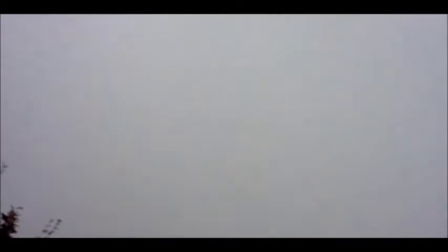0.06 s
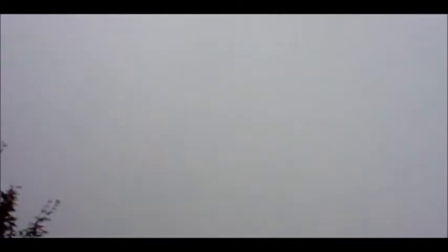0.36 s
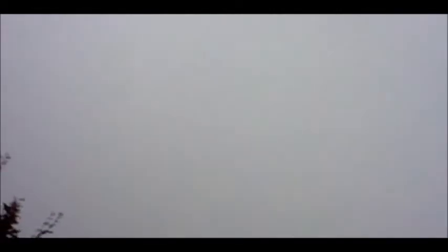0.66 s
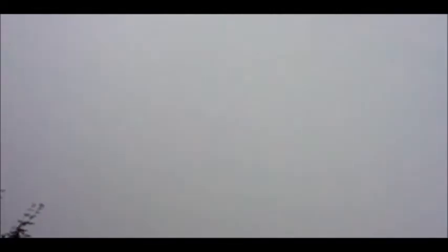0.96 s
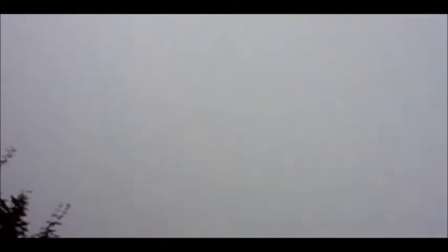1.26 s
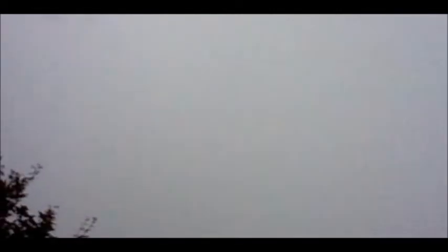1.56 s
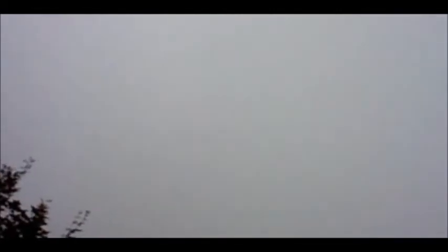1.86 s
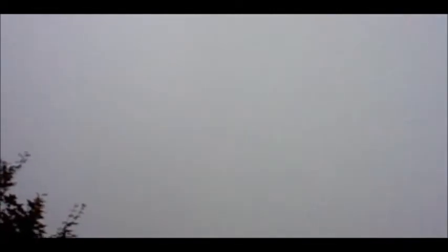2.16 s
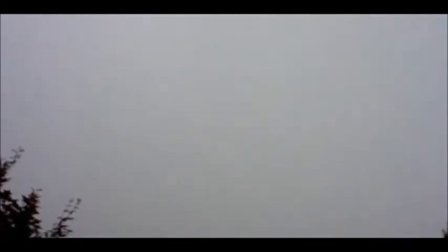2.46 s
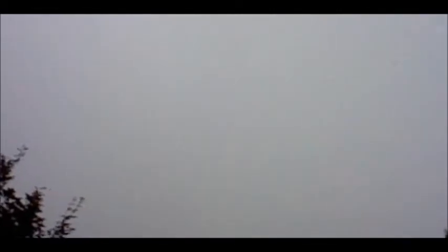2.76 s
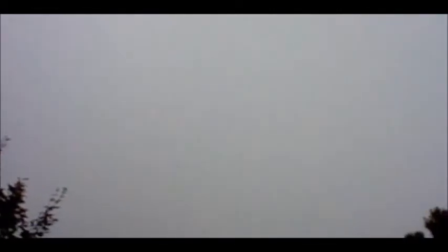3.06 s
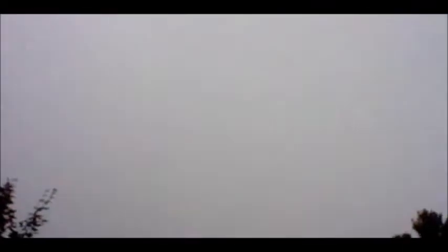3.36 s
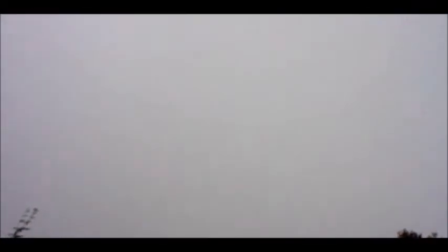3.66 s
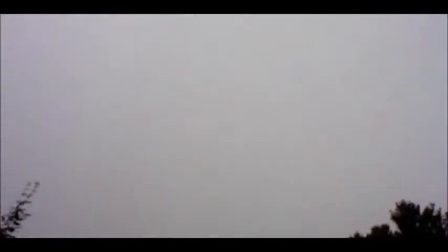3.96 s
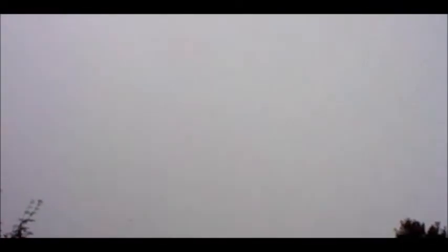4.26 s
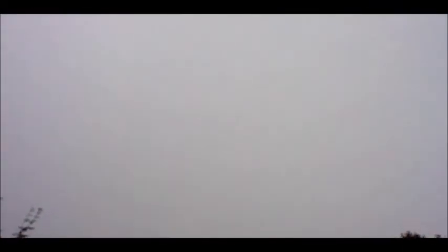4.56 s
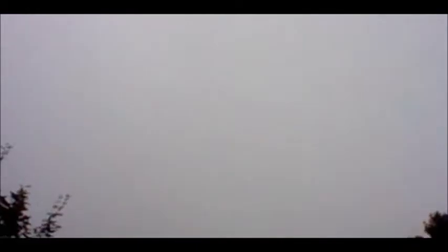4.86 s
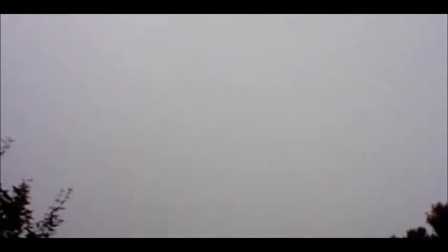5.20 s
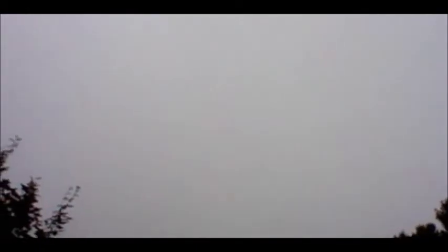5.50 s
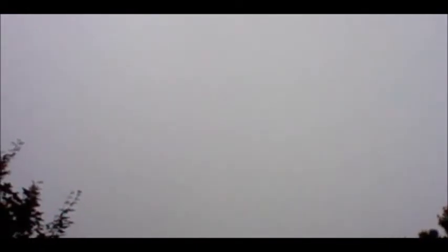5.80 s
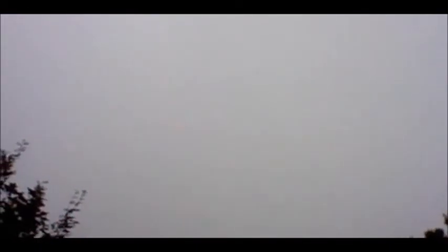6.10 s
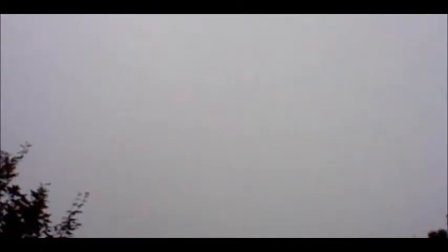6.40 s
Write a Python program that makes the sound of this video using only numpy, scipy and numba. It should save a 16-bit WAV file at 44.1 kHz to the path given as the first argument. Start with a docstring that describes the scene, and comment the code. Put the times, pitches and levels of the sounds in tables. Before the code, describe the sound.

A low mutter, then a sudden close thunderclap that overloads the microphone and rolls on in repeated peals over light wind.

```python
"""Thunder from a close lightning strike: a low mutter, a clap that overloads a small microphone, then
rolling peals. Each stretch of the lightning's path sends a cluster of shock waves that swells, holds
and dies; near ones are heavy, far ones lack bass. Land and houses scatter them into a fading rumble.
Behind it are light wind, a faint insect and a few ticking drops. The sound cuts out once, briefly."""
import sys
import numpy as np
from scipy import signal
from scipy.fft import rfft, irfft, next_fast_len
from scipy.io import wavfile
from scipy.ndimage import uniform_filter1d
from numba import njit

SR = 44100
rng = np.random.default_rng(int(sys.argv[2]) if len(sys.argv) > 2 else 0)


def master_out(mix):
    """Clip the mix to full scale and print it as 16-bit PCM to the path in sys.argv[1]."""
    frames = np.transpose(np.atleast_2d(mix))
    ceiling = np.clip(frames, -1, 1)
    pcm = np.round(ceiling * 32767).astype(np.int16)
    wavfile.write(sys.argv[1], SR, pcm)


N = 292824
TIME = np.arange(N) / SR

# Peals of thunder, one per stretch of the lightning's path. The body is a peal's middle range.
# (start [s], hold [s], body [dB], deep boom [dB], echoes [dB], pitch [Hz], pitched share of body [0-1])
PEALS = [(.872, 0.043, -45.5, -57, -61, 410, 0.05), (1.294, 0.065, -38, -40, -55, 340, 0.3),
         (1.392, 0.049, -35.5, -46, -59, 380, 0.13), (1.705, 0.018, -26.5, -10, -30.5, 226, 0),
         (1.737, 0.046, -10, -6, -29, 378, 0.07), (1.835, .04, -30.5, -15.5, -47, 297, 0),
         (1.908, 0.035, -23.5, -14.5, -38, 225, 0), (2.011, 0.046, -15.5, -20.5, -33, 401, 0.27),
         (2.21, 0.024, -13, -12.5, -33, 429, 0.3), (2.297, 0.092, -20, -22, -44.5, 340, 0.12),
         (2.538, 0.074, -13, -11.5, -39, 198, 0.23), (2.669, 0.053, -21, -32, -42, 288, 0.4),
         (2.778, 0.072, -13, -14.5, -32.5, 351, 0.42), (2.915, 0.056, -10.5, -13, -36, 210, 0.63),
         (3.075, 0.042, -13, -29.5, -43, 270, 0.97), (3.165, .035, -25, -25, -44, 241, 0.2),
         (3.243, 0.078, -20.5, -23.5, -39.5, 211, 0.76), (3.51, 0.071, -26, -35, -38.5, 273, 0.83),
         (3.748, 0.098, -16, -27, -43.5, 259, 0.75), (3.969, 0.027, -26.5, -43, -62, 226, .4),
         (4.067, 0.19, -22, -36, -41, 233, 0.48), (4.116, 0.048, -16.5, -17, -38.5, 227, 0.8),
         (4.26, 0.096, -29, -33.5, -65, 215, 0.4), (4.529, 0.013, -26, -46, -54, 246, 0.9),
         (4.783, 0.086, -18, -37, -45, 263, 0.63), (4.951, 0.037, -18, -32, -39, 221, 0.46),
         (5.018, 0.058, -20, -27, -54, 245, 0.1), (5.141, 0.049, -24, -45, -46, 220, 0.33),
         (5.273, 0.077, -16.5, -33, -43, 370, 0.34), (5.41, 0.065, -28.5, -39, -55, 294, 0),
         (5.858, 0.043, -18, -52, -44.5, 248, 0.98), (5.939, 0.05, -19, -47, -44, 231, 0.22),
         (6.231, 0.052, -24.5, -36, -47.5, 203, 0.5), (6.303, .05, -25, -49, -53, 196, 0.68),
         (6.546, 0.081, -20, -43, -48, 258, 0.31)]


def undb(db):
    """Turn decibels into a factor to multiply by."""
    return 10 ** (np.asarray(db) / 20)


def unit(x):
    """Scale a sound so that its average power is 1."""
    return x / np.sqrt(np.mean(x ** 2))


def colour(x, spectrum):
    """Shape a sound's tone with a curve of (frequency [Hz], level [dB]) points."""
    hz, db = np.transpose(spectrum)
    size = next_fast_len(N + SR // 4, True) // 2 * 2
    bin_hz = np.maximum(np.arange(size // 2 + 1) * SR / size, 1)
    gain = undb(np.interp(np.log(bin_hz), np.log(hz), db))
    # These steps make the filter ring only after each click, never before it.
    cepstrum = irfft(np.log(gain))
    cepstrum[1:size // 2] *= 2
    cepstrum[size // 2 + 1:] = 0
    return irfft(rfft(x, size) * np.exp(rfft(cepstrum)))[:N]


@njit
def resonate(x, hz, width_hz):
    """Let through the sound near a pitch that may move (a state-variable filter)."""
    out, band_state, low_state = np.empty(len(x)), 0., 0.
    for i in range(len(x)):
        step, damping = np.tan(np.pi * hz[i] / SR), width_hz / hz[i]
        ring = (band_state + step * (x[i] - low_state)) / (1 + step * (step + damping))
        band_state = 2 * ring - band_state
        low_state += 2 * step * ring
        out[i] = damping * ring
    return out


def band(x, hz, width_hz):
    """Resonate twice, so that little outside the band is left."""
    hz, width_hz = hz * np.ones(N), float(width_hz)
    return resonate(resonate(x, hz, width_hz), hz, width_hz)


def arrivals(per_s, spread_db):
    """Clicks of random time, sign and size."""
    hit = rng.random(N) < per_s / SR
    return hit * rng.choice([-1, 1], N) * undb(spread_db * rng.exponential(size=N))


def even(x, span_s):
    """Hold the power near 1 over every span, keeping the finer grain."""
    x, span = unit(x), max(int(span_s * SR), 2)
    power = uniform_filter1d(uniform_filter1d(x ** 2, span), span)
    return x / np.sqrt(np.abs(power) + 1e-6)


def swell(start, hold, release_s, attack_s=0.0091):
    """Loudness of one peal over time: it rises quickly, holds and dies away."""
    early, late = np.maximum(start - TIME, 0), np.maximum(TIME - start - hold, 0)
    return np.exp(-np.minimum(early / attack_s + late / release_s, 20))


def rumble(before_db, build_db_per_s, after_db, fade_db_per_s, clap_s=1.697):
    """Loudness of the rumble over time: it builds, jumps at the clap, then fades."""
    age = TIME - clap_s
    return undb(np.where(age < 0, before_db + build_db_per_s * age, after_db - fade_db_per_s * age))


def wind(level_db=-43):
    """Light steady wind and distant hiss."""
    # Tone of the moving air: (frequency [Hz], level [dB])
    wind_tone = [(20, -3), (60, 4.5), (100, -5), (150, -11.5), (400, -19.5), (700, -25.5), (1100, -23.5),
                 (1800, -34.5), (3000, -34.5), (6000, -37), (8000, -54)]
    return unit(colour(rng.standard_normal(N), wind_tone)) * undb(level_db)


def insect(level_db=-61.5, first_chirp_s=.15, chirp_every_s=.3236, floor=0.49):
    """A far insect rasps in one thin high band, swelling about three times a second."""
    rasp = unit(band(rng.standard_normal(N), hz=6626, width_hz=640))
    chirp = np.cos(np.pi * (TIME - first_chirp_s) / chirp_every_s) ** 2
    return rasp * (floor + (1 - floor) * chirp) * undb(level_db)


def drops(splash_db=-5, splash_s=0.0022, attack_s=0.0012):
    """Each drop splashes and rings briefly; it lands on its own spot, so no two sound alike."""
    # Drops near the microphone: (time [s], peak level [dB], brightness [dB per octave])
    landings = [(0.6584, -18.5, -4.5), (.869, -39, -3), (.874, -45, -2), (1.422, -35, -7.5),
                (2.014, -32, 11), (2.099, -35, -5), (2.169, -22.5, -8), (2.9171, -20, -4),
                (4.49, -23.5, -2), (4.504, -25.5, -2.5), (4.667, -33, 2), (4.673, -31.5, -9),
                (4.684, -33, 5), (6.433, -34.5, -8.5)]
    # Tones a drop rings with: (frequency [Hz], level [dB], time to fade by 60 dB [s])
    tones = [(730, -14.5, 0.006), (1270, -6, 0.0051), (2240, 0, 0.0044), (3090, -4.5, 0.0051),
             (4016, -14, 0.014), (5410, 3.5, 0.0048), (6550, -7, 0.0065)]
    out, t = np.zeros(N + SR), TIME[:SR // 20]
    hz, tone_db, fade_s = np.transpose(tones)[:, :, None]
    for time_s, peak_db, brightness in landings:
        tilt_db = brightness * np.log2(hz / hz.max())  # soft drops favour the low tones
        level_shift, pitch_shift = rng.standard_normal((2, len(hz), 1))
        loudness = undb(tone_db + tilt_db + 2 * level_shift - 60 * t / fade_s)
        ring = loudness * np.sin(2 * np.pi * hz * (1 + .015 * pitch_shift) * t)
        splash = undb(splash_db) * rng.standard_normal(len(t)) * np.exp(-t / splash_s)
        tick = (ring.sum(axis=0) + splash) * (1 - np.exp(-t / attack_s))
        start = int(time_s * SR)
        out[start:start + len(t)] += undb(peak_db) * tick / np.abs(tick).max()
    return out[:N]


def peals(rumble_hz=210, rumble_pitched=0.2):
    """Shock waves rounded by the air: long ones boom, short ones roll, alike ones give a pitch."""
    # Tone of the short, rolling waves: (frequency [Hz], level [dB])
    body_tone = [(70, -16), (120, -13.5), (160, 1.5), (205, 2.5), (250, -4), (330, -2.5), (420, -3.5),
                 (500, -9), (620, -20), (900, -27), (1600, -45.5), (4000, -64)]
    # Tone of the long, booming waves: (frequency [Hz], level [dB])
    boom_tone = [(15, -25.5), (28, -5.5), (58, -1), (95, 1.5), (125, -6), (180, -26.5), (400, -45.5),
                 (1000, -86.5)]
    body_power = rumble(before_db=-39.5, build_db_per_s=21.5, after_db=-22, fade_db_per_s=3) ** 2
    boom_power = rumble(before_db=-36.5, build_db_per_s=46, after_db=-18.5, fade_db_per_s=7) ** 2
    pitch_sum, share_sum = rumble_hz * body_power, rumble_pitched * body_power
    for start, hold, body_db, boom_db, _, pitch_hz, pitched_share in PEALS:
        power = (undb(body_db) * swell(start, hold, release_s=0.042)) ** 2
        body_power += power
        pitch_sum += pitch_hz * power
        share_sum += pitched_share * power
        boom_power += (undb(boom_db) * swell(start, hold, release_s=0.047)) ** 2
    hz = pitch_sum / body_power  # the loudest peal counts most
    share = np.clip(share_sum / body_power, 0, 1)
    roll = even(colour(arrivals(per_s=700, spread_db=2.5), body_tone), span_s=0.026)
    pitched = even(band(arrivals(per_s=400, spread_db=2.5), hz, width_hz=80), span_s=0.022)
    body = np.sqrt(1 - share) * roll + np.sqrt(share) * pitched
    boom = even(colour(arrivals(per_s=200, spread_db=2.5), boom_tone), span_s=0.014)
    return body * np.sqrt(body_power) + boom * np.sqrt(boom_power)


def echoes():
    """Countless weak echoes carry the higher sounds, trail each peal and fill the lulls."""
    # Tone of thunder scattered by land and houses: (frequency [Hz], level [dB])
    echo_tone = [(250, -24.5), (500, 5.5), (700, 1.5), (1000, 1.5), (1350, -8), (1700, -18.5),
                 (2100, -21.5), (2700, -39.5), (4200, -30.5), (5400, -34), (7000, -31.5), (9000, -46)]
    power = rumble(before_db=-49, build_db_per_s=15, after_db=-36, fade_db_per_s=2.5) ** 2
    for start, hold, _, _, echo_db, *_ in PEALS:
        power += (undb(echo_db) * swell(start, hold, release_s=.06)) ** 2
    scattered = colour(arrivals(per_s=6000, spread_db=2), echo_tone)
    return even(scattered, span_s=0.042) * np.sqrt(power)


def crackle(below_body_db=42.5):
    """A faint dry crackle rides on each peal."""
    # Tone of the crackle: (frequency [Hz], level [dB])
    crackle_tone = [(800, -21.5), (2000, -8), (4000, -1.5), (7000, 2), (9000, -12.5)]
    power = np.zeros(N)
    for start, hold, body_db, *_ in PEALS:
        power += (undb(body_db - below_body_db) * swell(start, hold, release_s=0.028)) ** 2
    return unit(colour(arrivals(per_s=2000, spread_db=3), crackle_tone)) * np.sqrt(power)


def thumps_and_crack(echo_s=0.0094, echo_db=-10):
    """Each pulse is a crest between two dips, as the microphone cuts bass; a wall echoes the thumps."""
    # Single strong thumps of thunder, and a bright crack as the clap overloads the microphone:
    # (time [s], peak level [dB], pitch [Hz])
    pulses = [(1.7021, 3.5, 74), (1.711, -17.5, 520), (1.745, 9.5, 105), (1.7494, -15.5, 3850),
              (1.75, -12, 600), (1.7635, -6, 500), (1.766, -18, 1700), (2.017, 5, 138), (2.329, -0.5, 74),
              (2.548, 2, 95), (2.921, -9, 85), (2.933, -2.5, 140), (3.278, -14.5, 385), (3.754, -2.5, 240),
              (3.799, -15, 380), (4.139, -10, 134), (4.807, -9, 340), (4.864, -12.5, 430),
              (4.966, -6.5, 228), (5.2979, -8, 290), (5.86, -10.5, 260), (6.581, -11, 380)]
    out = np.zeros(N)
    for time_s, peak_db, hz in pulses:
        for delay, gain in ((0, 1), (echo_s, undb(echo_db))):
            age = TIME - time_s - delay
            near = np.abs(age) < 2 / hz
            phase = np.pi * hz * age[near]
            out[near] += gain * undb(peak_db) * (1 - 2 * phase ** 2) * np.exp(-phase ** 2)
    return out


def scene():
    """Thunder, drops, wind and insect add up at one microphone."""
    return (peals() + echoes() + thumps_and_crack() + drops() + wind() + insect() + crackle())[None]


def record(dry, cut_s=2.8685, resume_s=2.901, fade_in_s=.002, top_hz=7500):
    """The microphone flattens the loudest crests, the sound cuts out briefly, and high treble is lost."""
    flattened = dry / (1 + dry ** 30) ** (1 / 30)
    sound_on = (TIME < cut_s) + np.clip((TIME - resume_s) / fade_in_s, 0, 1)
    treble_cut = signal.ellip(8, .2, 70, top_hz, fs=SR, output="sos")
    return signal.sosfilt(treble_cut, flattened * sound_on)


dry = scene()
out = record(dry)
master_out(out)
```